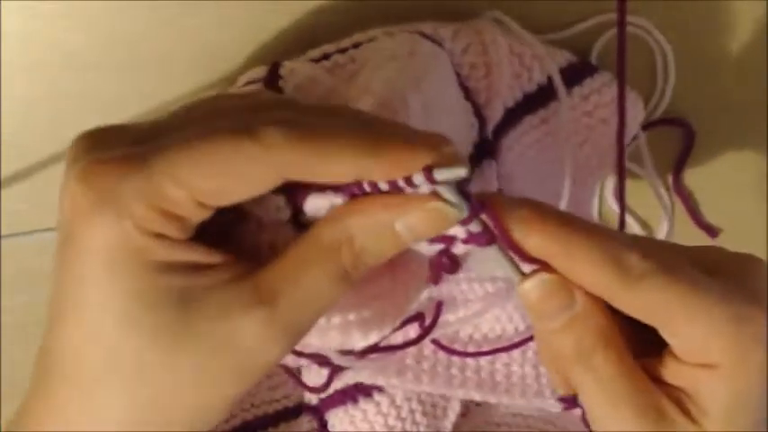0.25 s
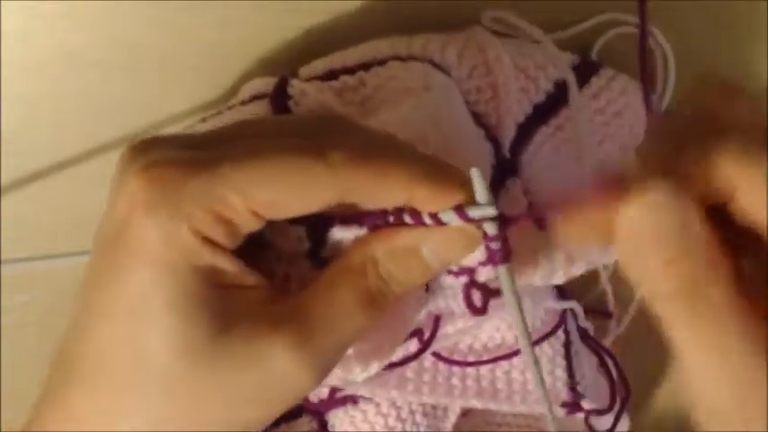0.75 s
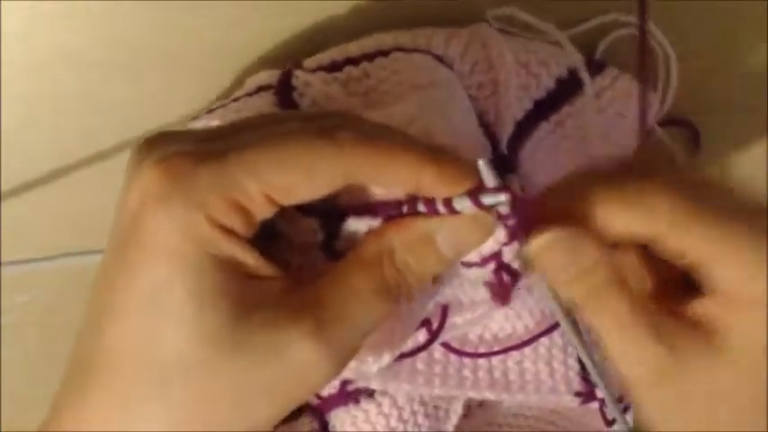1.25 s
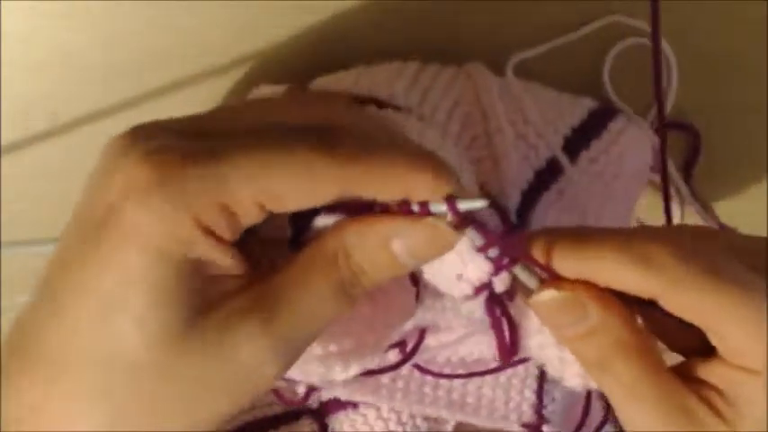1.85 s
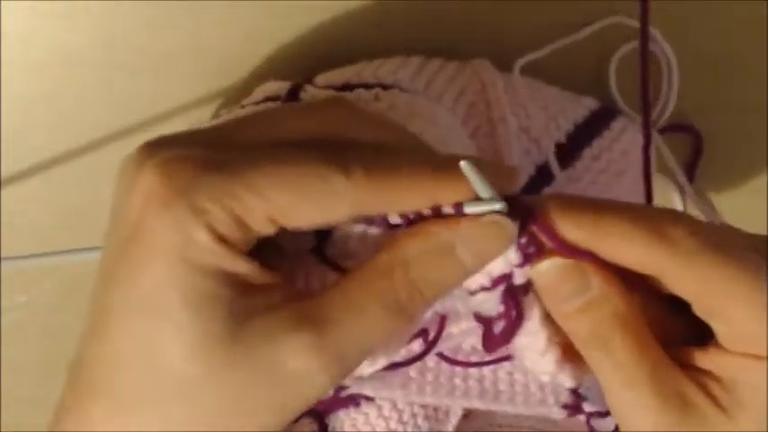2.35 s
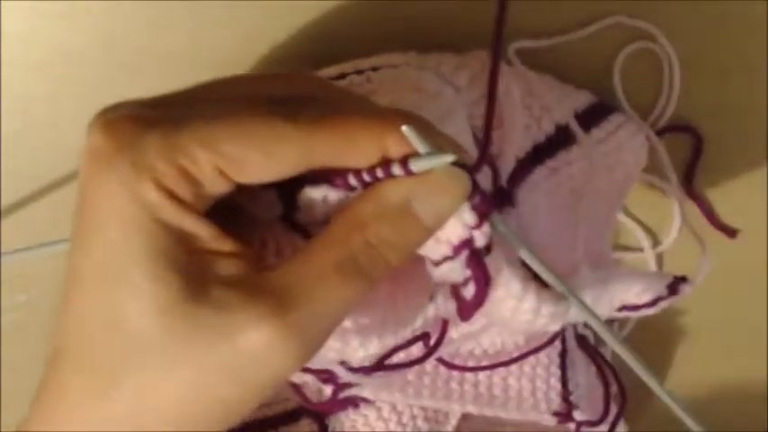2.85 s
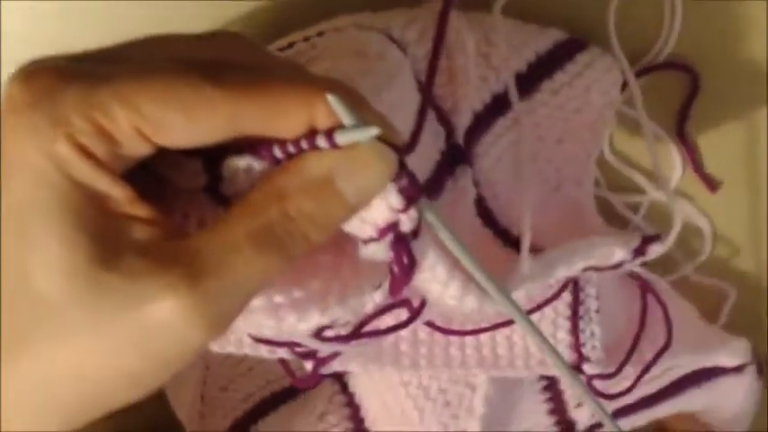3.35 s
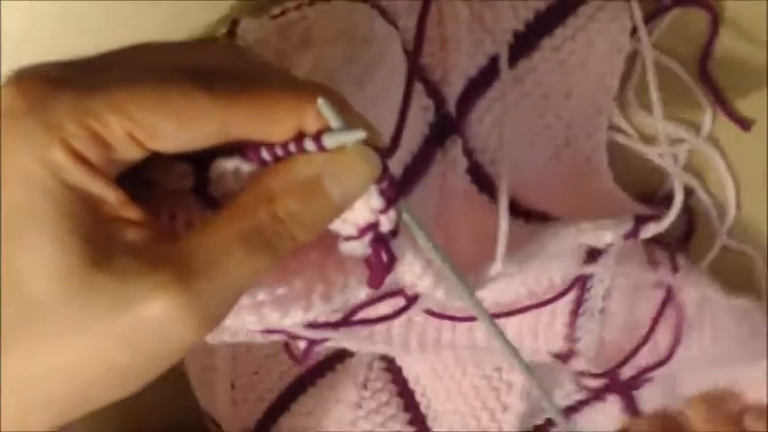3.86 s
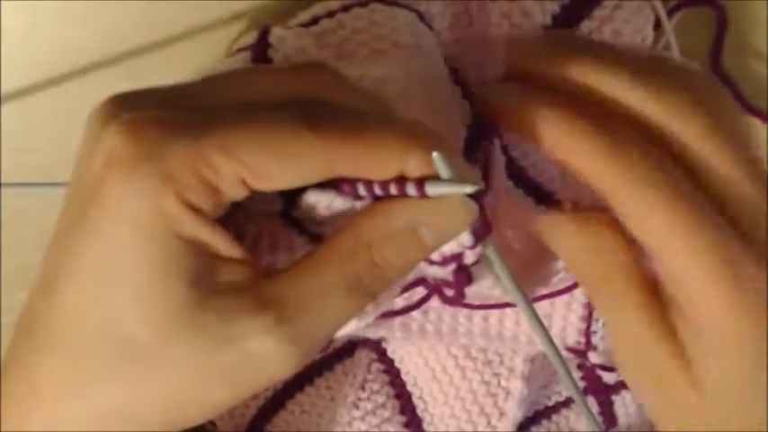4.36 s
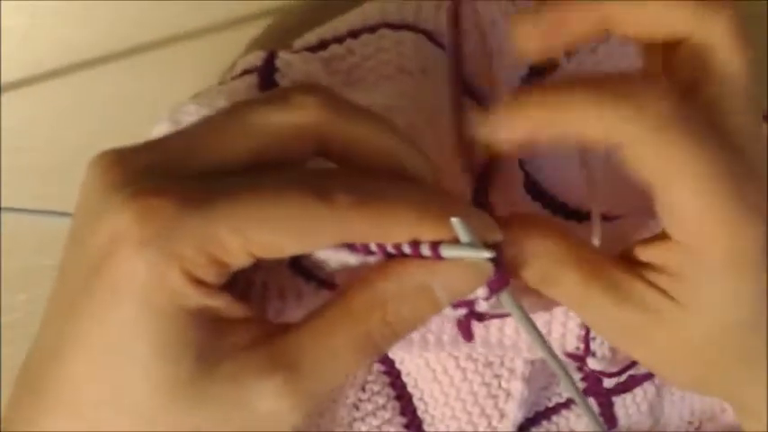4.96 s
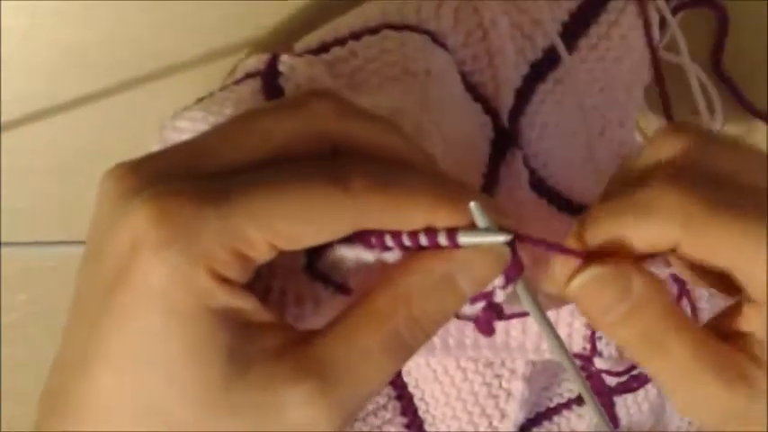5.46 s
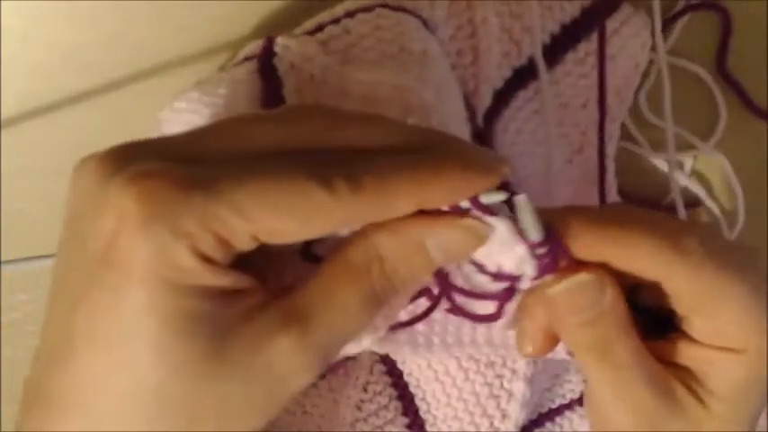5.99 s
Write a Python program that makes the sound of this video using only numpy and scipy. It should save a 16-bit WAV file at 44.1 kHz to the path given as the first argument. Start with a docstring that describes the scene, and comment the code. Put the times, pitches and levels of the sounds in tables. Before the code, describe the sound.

Close-up knitting: faint bumps, one loud table clack with smaller rattles, crisp metallic ticks, then a smooth yarn hiss and duller taps.

```python
"""Knitting at a table

Small quiet room, metal needles over a table, stereo pair close by: the tips tick in double touches of
short ringing modes; a needle end knocks on the table (noise crack, clank, damped ring) and slides
along it (resonant noise). Yarn hisses through as a dense train of snags, hands bump as low swells,
and behind it all lie soft room air, an appliance hum of three wavering tones and microphone hiss."""
import sys
import numpy as np
from scipy import signal
from scipy.fft import rfft, irfft, next_fast_len
from scipy.io import wavfile

SR = 44100
rng = np.random.default_rng(int(sys.argv[2]) if len(sys.argv) > 2 else 0)


def master(y):
    """Save y as 16-bit WAV."""
    cut = np.clip(np.atleast_2d(y).T, -1, 1)
    pcm = np.round(cut * 32767)  # scale
    wavfile.write(sys.argv[1], SR, pcm.astype(np.int16))


N = 274555
TIME = np.arange(N) / SR


def from_db(db):
    """Decibels to gain."""
    return 10 ** (np.asarray(db) / 20)


def rms_one(x):
    """Scale to unit power."""
    return x / np.sqrt(np.mean(x ** 2) + 1e-20)


def at_hz(points, hz):
    """Read a table on a log-frequency axis."""
    f, value = np.transpose(points)
    return np.interp(np.log(np.maximum(hz, 1)), np.log(f), value)


def shaped(x, gain):
    """Filter x by a gain given as a function of frequency; unit power."""
    size = next_fast_len(x.shape[-1])
    spectrum = rfft(x, size) * gain(np.fft.rfftfreq(size, 1 / SR))
    return rms_one(irfft(spectrum, size)[..., :x.shape[-1]])


def coloured(x, spectrum):
    """Weight x by a spectrum table; unit power."""
    return shaped(x, lambda f: from_db(at_hz(spectrum, f)))


def cut(x, hz, kind, order=2):
    """Causal low- or high-pass."""
    sos = signal.butter(order, min(hz, .45 * SR), kind, fs=SR, output="sos")
    return signal.sosfilt(sos, x + 1e-18)


def narrow_noise(hz, width_hz):
    """Noise through one resonance; unit power."""
    return shaped(rng.standard_normal(N), lambda f: 1 / (1 + ((f - hz) / width_hz) ** 2))


def fade(t, t60):
    """Free decay by 60 dB in t60 seconds."""
    return np.exp(-np.log(1000) * t / t60)


def struck(modes, t, spread_db=0):
    """Sum of decaying modes with alternating signs; spread_db scatters their strengths."""
    total = np.zeros(len(t))
    for k, (hz, db, t60) in enumerate(modes):
        strength = (-1) ** k * from_db(db + spread_db * rng.normal())
        total += strength * np.sin(2 * np.pi * hz * t) * fade(t, t60)
    return total


def add(track, s, sound):
    """Mix a sound in at time s."""
    start = round(s * SR)
    track[..., start:start + sound.shape[-1]] += sound[..., :N - start]


def pan(x, left_db):
    """Raise the left side and lower the right, each by left_db."""
    return x * from_db(left_db * np.array([[1], [-1]]))


def spread(x, left):
    """Pan each frequency by a table."""
    size = next_fast_len(N + SR // 10)
    left_db = at_hz(left, np.fft.rfftfreq(size, 1 / SR))
    return irfft(pan(rfft(x, size), left_db), size)[:, :N]


def reflected(pair, wall_db, wall_s, dull_hz):
    """A dull reflection reaches the two sides with opposite sign."""
    late = np.interp(TIME - wall_s, TIME, pair.mean(axis=0), left=0)
    echo = from_db(wall_db) * cut(late, dull_hz, "low", order=1)
    return pair + echo * [[1], [-1]]


def stroke(start_s, length_s, arch):
    """Gain of one hand stroke: speed follows half a sine, loudness a power of speed."""
    part = (TIME - start_s) / length_s
    inside, gain = (part > 0) & (part < 1), np.zeros(N)
    gain[inside] = np.sin(np.pi * part[inside]) ** arch
    return gain


def hum_line(hz, width_hz, waver=.4):
    """A motor tone that wavers a little in level and phase; unit power."""
    tone = np.sin(2 * np.pi * (hz * TIME + rng.random()))
    return rms_one(tone + waver * narrow_noise(hz, width_hz))


# Room air at the microphone, relative spectrum: f/Hz, level/dB per Hz
AIR = [(30, -37.5), (80, -25.5), (120, -7), (165, -4.5), (215, -7.5), (280, -9), (360, -17), (600, -19),
       (1500, -24), (2500, -28.5), (4000, -35), (6800, -34.5), (7400, -45), (8000, -55.5)]
# Where the air lies in the stereo pair: f/Hz, left minus right level/dB
AIR_LEFT = [(80, 0.5), (180, 3), (310, 5), (530, 4.5), (1500, 0), (3000, 0)]
# How alike the air is on the two sides: f/Hz, left-right correlation (0 to 1)
LIKENESS = [(40, .5), (150, 0.87), (500, 0.95), (2000, 0.94), (7000, 0.918)]
# Tones of the distant appliance: f/Hz, level/dB, width f/Hz
HUM = [(198.7, -72.5, 5.8), (244.55, -73, 10), (440.2, -73.5, 14)]


def background(air_db=-68.5, hum_left_db=2.5, hiss_db=-99):
    """Low room air and an appliance hum, both leaning left, and faint microphone hiss."""
    mid, side = rng.standard_normal((2, N))
    size = next_fast_len(N)
    hz = np.fft.rfftfreq(size, 1 / SR)
    alike = np.clip(at_hz(LIKENESS, hz), 0, 1)
    # a shared part plus a part of opposite sign sets the likeness
    shared = np.sqrt(1 + alike) * rfft(mid, size)
    opposed = np.sqrt(1 - alike) * rfft(side, size) * [[1], [-1]]
    pair = (shared + opposed) * from_db(at_hz(AIR_LEFT, hz) * [[.5], [-.5]])
    air = from_db(air_db) * coloured(irfft(pair, size)[:, :N], AIR)
    hum = sum(from_db(db) * hum_line(pitch, width) for pitch, db, width in HUM)
    hiss = from_db(hiss_db) * rng.standard_normal((2, N))
    return air + pan(hum, hum_left_db) + hiss


# Knitting settles after each bump with a weaker, lower second one
SETTLE_S, SETTLE_LOSS_DB, SETTLE_PITCH = 0.027, 5.5, 0.83
# Faint bumps in between: mean rate, level before bump_db, middle of a one-octave pitch range
NUDGES_PER_S, NUDGE_DB, NUDGE_HZ = 2.0, -60.5, 199
# Soft bumps of hands and knitting: t/s of the peak, level/dB before bump_db, pitch f/Hz
BUMPS = [(.252, -42.5, 218), (1.455, -48.5, 259.5), (1.824, -46.5, 166.6), (2.16, -48, 229),
         (2.336, -48, 174.4), (2.442, -48.5, 199.8), (3.898, -55, 193.7), (4.131, -51.5, 203.4),
         (4.253, -50.5, 228), (5.411, -52.5, 230.6), (5.481, -50.5, 234.8), (5.689, -50, 201),
         (6.128, -53.5, 239.8), (6.222, -50.5, 248.5)]


def bumps(width_s=0.0087, rough=0.32, bump_db=-2.0):
    """A soft push swells and dies within a few cycles, then settles; faint nudges come at random."""
    out, t = np.zeros(N), TIME[:SR // 5]
    middle = t[-1] / 2
    chance = rng.random((40, 2))
    times = middle + np.cumsum(-np.log(1 - chance[:, 0])) / NUDGES_PER_S
    nudges = [(s, NUDGE_DB, NUDGE_HZ * 2 ** (u - .5))
              for s, u in zip(times, chance[:, 1]) if s < TIME[-1]]
    for s, db, hz in BUMPS + nudges:
        rub = cut(rng.standard_normal(len(t)), 145, "high", order=4)
        rub = rms_one(cut(rub, 237, "low", order=3))
        for k in range(2):
            level = from_db(db + bump_db - k * SETTLE_LOSS_DB)
            swell = level * np.exp(-((t - middle - k * SETTLE_S) / width_s) ** 2)
            thud = np.sin(2 * np.pi * (hz * SETTLE_PITCH ** k * t + rng.random()))
            add(out, s - middle, swell * (thud + rough * rub))
    return out


PULL_ARCH = .8   # power of speed that loudness follows
# Hiss of the yarn, relative spectrum: f/Hz, level/dB per Hz
YARN = [(880, -12.5), (1500, -14.5), (1640, -31), (1890, -13.5), (2260, -24.5), (2410, -16), (2610, -18.5),
        (3590, -7.5), (5330, -2), (5900, 2), (6480, -6.5), (7270, -8.5), (8400, -35.5), (10900, -63),
        (18500, -120)]
# Yarn drawn over needle and fingers: start t/s, length t/s, level/dB before yarn_db
PULLS = [(0.173, .14, -84), (0.406, .22, -84.5), (2.012, 0.12, -75), (2.596, 0.086, -68.5),
         (3.056, 0.57, -53), (3.536, 0.31, -51), (3.816, 0.28, -79), (5.054, 0.092, -72),
         (5.276, 0.053, -73), (5.318, .15, -83.5)]


def yarn(snags_per_s=5000, snag_db=1.0, needle_hz=5930, needle_db=-7, yarn_db=-2.0, low_hz=250,
         flutter_db=1.4, flutter_hz=25):
    """Fibres catch and let go thousands of times a second; the needle sings and the hiss flutters."""
    caught = rng.random(N) < snags_per_s / SR
    strength = from_db(snag_db * np.minimum(rng.exponential(1, N), 4))
    snags = caught * rng.choice([-1, 1], N) * strength
    hiss = cut(coloured(snags, YARN), low_hz, "high")
    rustle = hiss + from_db(needle_db) * narrow_noise(needle_hz, 150)
    power = sum((from_db(db) * stroke(s, length_s, PULL_ARCH)) ** 2 for s, length_s, db in PULLS)
    flutter = from_db(flutter_db * narrow_noise(0, flutter_hz))
    return from_db(yarn_db) * rustle * np.sqrt(power) * flutter


SLIDE_ARCH = 1.2   # power of speed that loudness follows
# Needle end sliding on the table: start t/s, length t/s, level/dB, resonance f/Hz
SLIDES = [(1.411, 0.075, -41.5, 1000), (1.485, 0.054, -48, 830), (3.402, 0.071, -64, 1290),
          (3.521, 0.031, -63.5, 1230), (3.562, 0.13, -57.5, 1220), (4.579, 0.034, -57.5, 995)]


def slides(width_hz=170, grit_db=0, grit_hz=1750, grit_width_hz=550, grit_growth=0.2):
    """Friction excites a resonance set by where the needle end lies; harder pushes add grit above."""
    out, grit = np.zeros(N), narrow_noise(grit_hz, grit_width_hz)
    hardest_db = max(row[1] for row in SLIDES)
    for s, length_s, db, hz in SLIDES:
        grit_gain = from_db(grit_db + grit_growth * (db - hardest_db))
        scrape = narrow_noise(hz, width_hz) + grit_gain * grit
        out += from_db(db) * stroke(s, length_s, SLIDE_ARCH) * scrape
    return cut(out, 730, "high")


SECOND_TOUCH_DB = 0.5   # against the first touch
# Ringing of the needle tips: f/Hz, level/dB, t60 t/s
TIP_MODES = [(4030, -20, .002), (4700, -7, 0.0046), (5600, -10, 0.0042), (6300, -54, 0.0019)]
# Ringing of the needle shaft: f/Hz, level/dB, t60 t/s
SHAFT_MODES = [(2434, -22, 0.028), (5010, -9, 0.0097), (6020, -9, 0.006)]
# Tips touching twice in quick succession: t/s, level/dB, shaft ring/dB, gap to the second touch t/s
TICKS = [(0.591, -62, -17, .001), (1.577, -58, -11.5, .001), (2.4045, -36, 5.5, .0012),
         (2.6362, -37.5, -10.5, 0.0043), (2.6681, -29.5, -15, 0.0034), (3.7198, -30, -18.5, 0.00061),
         (4.297, -63, -9, 0.00103), (5.698, -58.5, -10, 0.0036), (5.9025, -34.5, -1, 0.000957)]


def ticks(snap_db=-8, chatter_db=-15, chatter_t60=0.019, room_db=-24, room_t60=0.13, room_low_hz=4500):
    """Tips snap, chatter and touch again; fingers damp them, shaft and room ring on faintly."""
    out, t = np.zeros(N), TIME[:SR // 5]
    tip_ring = sum(struck([mode], t) for mode in TIP_MODES)   # all with the same sign
    tip = cut(tip_ring + from_db(snap_db) * fade(t, 0.000084), 2470, "high")
    for s, db, shaft_db, gap_s in TICKS:
        shaft = from_db(shaft_db) * struck(SHAFT_MODES, t)
        for k in range(2):
            chatter = cut(rng.standard_normal(len(t)), 5400, "high")
            chatter = from_db(chatter_db) * chatter * fade(t, chatter_t60)
            room = cut(rng.standard_normal(len(t)), room_low_hz, "high", order=1)
            room = from_db(room_db) * room * fade(t, room_t60)
            touch = from_db(db + k * SECOND_TOUCH_DB) * (tip + chatter + shaft + room)
            add(out, s + k * gap_s, touch)
    return out


# Modes of the table top: f/Hz, level/dB, t60 t/s
TABLE_MODES = [(245, -18, 0.51), (296, -9, 0.43), (440, -11, 0.33), (504, -2, 0.3), (816, -4, 0.29),
               (844, -5, 0.29), (962, -3, 0.29), (1013, -5, 0.29), (1097, -4, 0.29), (1378, -3, 0.3),
               (1491, -5, 0.31), (1512, -1, 0.31), (1695, -5, 0.31), (1829, -5, 0.32), (2038, -4, 0.32),
               (2177, -6, 0.33), (2400, 0, 0.33), (2422, 0, 0.33), (2511, -6, 0.33), (2953, -11, 0.31),
               (3436, -10, 0.3), (3650, -9, 0.29), (3873, -9, 0.28), (4028, -11, 0.28), (4066, -5, 0.28),
               (4428, -11, 0.27), (4747, -13, 0.26), (4969, -7, 0.26), (5059, -9, 0.26), (5273, -10, 0.25)]


def through_table(x, width_hz=45, lift_db=7):
    """The table radiates best close to its modes and poorly between them; unit power."""
    def radiation(f):
        near = [1 / (1 + ((f - hz) / width_hz) ** 2) for hz, _, _ in TABLE_MODES]
        return from_db(lift_db * np.max(near, axis=0))
    return shaped(x, radiation)


# Dense ring after the crack, relative spectrum: f/Hz, level/dB per Hz
RING = [(120, -27), (280, 0.5), (360, -18), (490, -1), (680, -13.5), (930, -1), (1220, -7.5), (1550, 1),
        (2400, 0.5), (3220, -4.5), (4000, -7.5), (5300, -10), (6500, -13), (9000, -32.5)]
# Free decay of the dense ring: f/Hz, t60 t/s
RING_T60 = [(150, 0.79), (400, 0.45), (1000, 0.28), (2700, 0.24), (7300, 0.42)]


def dense_ring(t):
    """Countless overlapping resonances of table and room, each band with its own decay."""
    spectrum = rfft(coloured(rng.standard_normal(len(t)), RING))
    hz, ring = np.fft.rfftfreq(len(t), 1 / SR), np.zeros(len(t))
    edges = np.geomspace(40, 20000, 13)
    for low, high in zip(edges, edges[1:]):
        band = irfft(spectrum * (hz >= low) * (hz < high), len(t))
        ring += band * fade(t, at_hz(RING_T60, np.sqrt(low * high)))
    return ring


# Crack length at a high edge of 1 kHz; power by which softer contacts last longer
CRACK_T60_S, CRACK_SOFTENING = 0.051, .45
CLANK_HZ, CLANK_WIDTH_HZ, CLANK_T60_S = 4500, 900, .03   # bright clank of the metal itself
CLANK_DB, CLANK_GROWTH = -12.5, 1.8   # in the hardest knock; dB it gains per dB of force
BENDING_DB = -40.5   # the held needle flexes about equally in every knock
# First crack of a knock, relative spectrum: f/Hz, level/dB per Hz
CRACK = [(100, -18), (250, -12), (500, -5), (1000, 3), (1320, 0.5), (1900, -1.5), (2700, -12), (3000, -3),
         (3600, -8.5), (4100, -10), (5200, 0), (5900, -4), (7200, -7.5), (9000, -26)]
# Needle held against the table: f/Hz, level/dB, t60 t/s
BENDING_MODES = [(420, -9, 0.29), (494, -4.5, 0.14), (600, -7.5, 0.17), (769, 1.5, 0.17),
                 (1150, -9.5, 0.051)]
# Needle end on the table, a padded contact having a lower high edge:
# t/s, level/dB, low edge f/Hz, high edge f/Hz, ring/dB against the level, damped after t/s
KNOCKS = [(1.1160, -11.5, 198, 8800, 1, .17), (1.2513, -24, 593, 7100, 4, .06),
          (1.3083, -29.5, 717, 7000, 3.5, 0.09), (1.4521, -30.5, 483, 7400, -2.5, 0.065),
          (1.4933, -37, 802, 6165, -4, 0.061), (3.287, -39.5, 740, 1270, .5, 0.069),
          (3.823, -37, 398.6, 746, 8, 0.067), (4.536, -30, 880, 3110, 1.5, 0.066),
          (4.545, -37, 404, 556, 15.5, 0.026)]


def knocks(rise_s=0.00078, dense_db=-13.0, modes_db=-21.5, build_s=0.0017):
    """Crack and clank, then table and needle ring until the ring is cut short; padding dulls and lengthens."""
    out, t = np.zeros(N), TIME[:SR // 2]
    dense = dense_ring(t)   # shared by every knock
    dense = from_db(dense_db) * dense.std() * through_table(dense, width_hz=24, lift_db=7.5)
    hardest_db = max(row[1] for row in KNOCKS)
    for s, db, low_hz, high_hz, ring_db, stop_s in KNOCKS:
        crack_t60 = CRACK_T60_S * (1000 / high_hz) ** CRACK_SOFTENING
        crack = coloured(rng.standard_normal(len(t)), CRACK)
        crack = through_table(crack, width_hz=80, lift_db=2)
        crack = from_db(db) * crack * fade(t, crack_t60)
        crack = crack * (1 + 1.3 * fade(t, .02))   # stronger at the onset

        metal = shaped(rng.standard_normal(len(t)),
                       lambda f: 1 / (1 + ((f - CLANK_HZ) / CLANK_WIDTH_HZ) ** 4))
        clank_gain = from_db(CLANK_DB + CLANK_GROWTH * (db - hardest_db))
        clank = clank_gain * metal * fade(t, CLANK_T60_S)

        table = dense + from_db(modes_db) * struck(TABLE_MODES, t, spread_db=2.5)
        needle = from_db(BENDING_DB) * struck(BENDING_MODES, t)
        ring = from_db(db + ring_db) * table + needle
        damping = np.exp(-(t / stop_s) ** 2)
        attack = (crack + clank) * (1 - np.exp(-t / rise_s))
        blow = attack + ring * (1 - np.exp(-t / build_s)) * damping
        add(out, s, cut(cut(blow, low_hz, "high", order=3), high_hz, "low", order=5))
    return out


def microphone(x, edge_hz=7500, leak_db=-30):
    """The microphone's response falls steeply above the edge; a faint full-range leak remains."""
    return cut(x, edge_hz, "low", order=16) + from_db(leak_db) * x


# Where the table lies in the stereo pair: f/Hz, left raised and right lowered by level/dB
TABLE_LEFT = [(300, -0.76), (520, 1.5), (1000, -0.6), (2000, -1.24), (4500, 0.6)]


def scene():
    """Hands, yarn, needles and table close to the microphone, over the room's background."""
    hands = reflected(pan(bumps(), left_db=5.0), wall_db=-16.5, wall_s=0.0033, dull_hz=890)
    wool = reflected(pan(yarn(), left_db=0.35), wall_db=-20, wall_s=.003, dull_hz=3000)
    needles = reflected(pan(ticks(), left_db=1.0), wall_db=-14, wall_s=.003, dull_hz=3000)
    table = spread(slides() + knocks(), TABLE_LEFT)
    table = reflected(table, wall_db=-14.5, wall_s=.0046, dull_hz=900)
    return background() + hands + wool + microphone(needles + table)


def record(dry):
    """The top is cut, by at least 70 dB from 16 kHz up."""
    return signal.sosfilt(signal.cheby2(12, 70, 16000, fs=SR, output="sos"), dry)


dry = scene()
out = record(dry)
master(out)
```